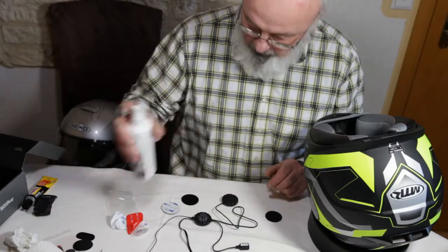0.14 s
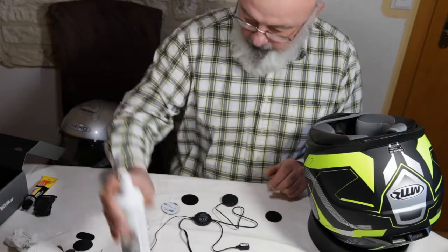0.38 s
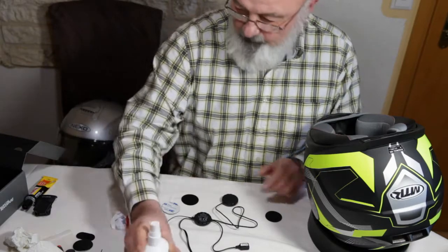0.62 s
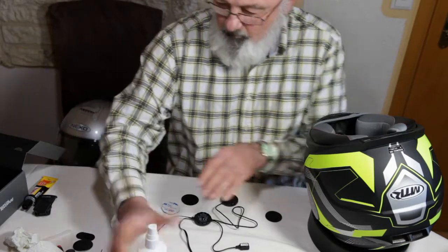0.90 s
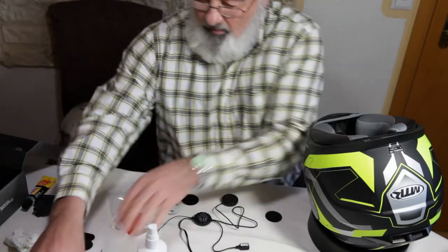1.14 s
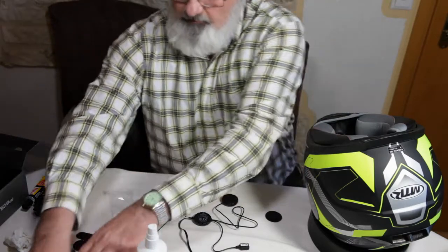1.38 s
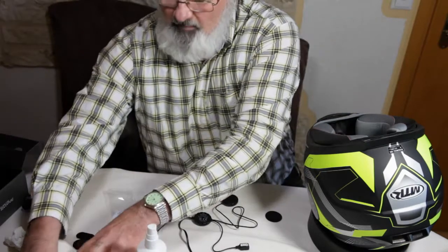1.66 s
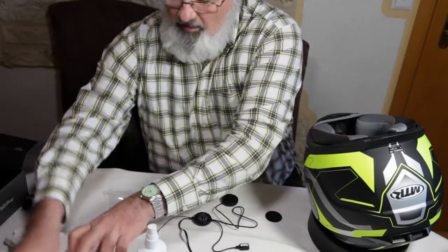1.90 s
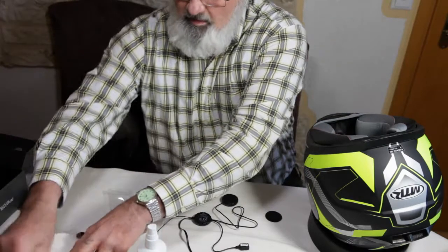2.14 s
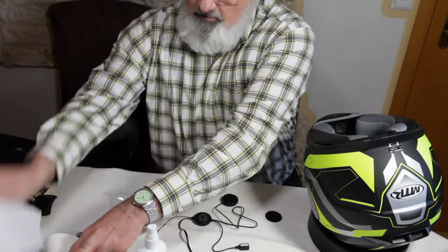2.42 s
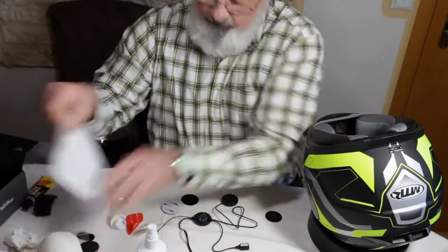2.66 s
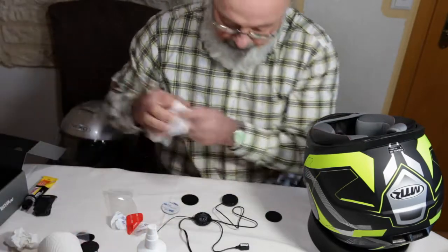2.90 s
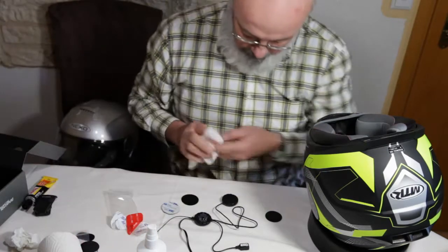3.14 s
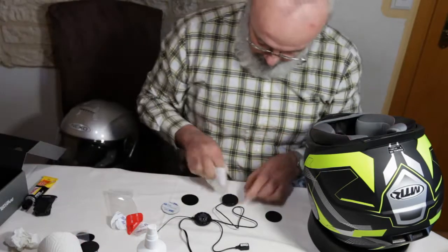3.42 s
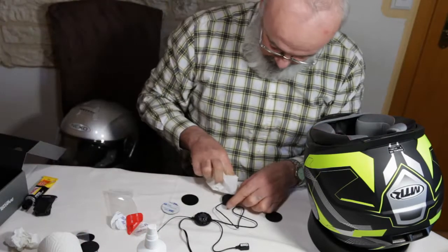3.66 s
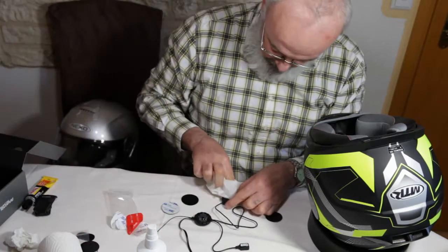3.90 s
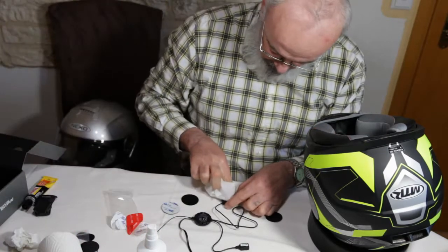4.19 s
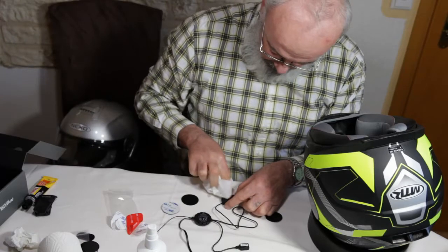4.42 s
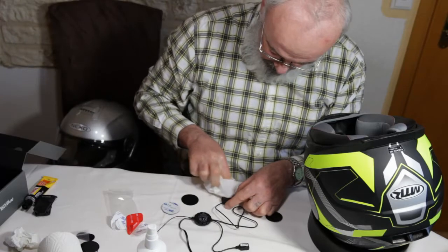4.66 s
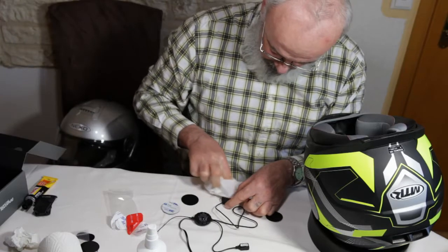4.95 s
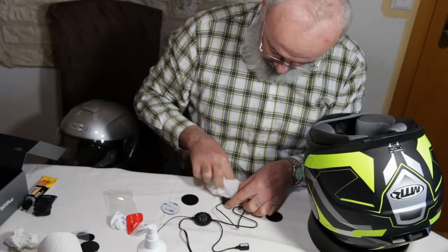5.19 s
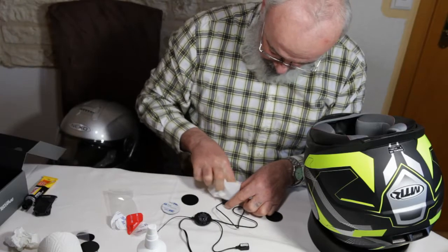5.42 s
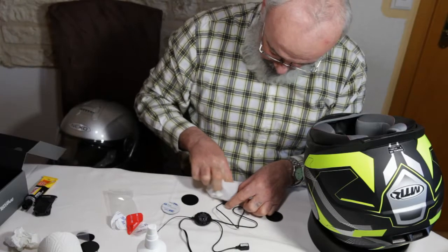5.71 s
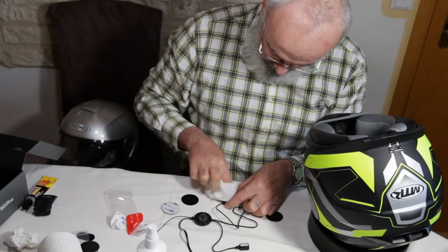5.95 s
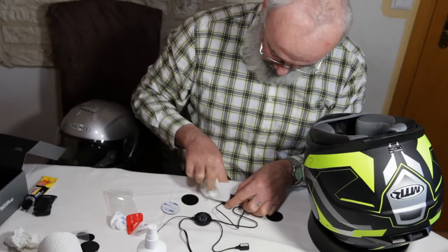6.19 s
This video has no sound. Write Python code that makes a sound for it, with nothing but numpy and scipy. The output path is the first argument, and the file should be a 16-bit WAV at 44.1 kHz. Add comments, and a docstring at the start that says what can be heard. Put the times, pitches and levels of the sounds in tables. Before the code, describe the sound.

In a quiet room, a dull table thump, papery rummaging, one loud crisp snap, tissue crumpling, then gentle back-and-forth rubbing.

```python
"""In a quiet room a bottle is set down on a cloth-covered table, hands rummage in a cardboard box,
pull out a paper tissue with a sharp clack, crumple it and wipe small plastic discs back and forth.
Rubbing is noise and tiny clicks shaped by strokes; knocks, snaps and bottle are decaying modes.
The near sounds excite a reverberant tail, over steady room tone. One microphone feeds both channels."""
import sys
import numpy as np
from scipy import signal
from scipy.io import wavfile
from scipy.ndimage import uniform_filter1d

SR = 44100
rng = np.random.default_rng(int(sys.argv[2]) if len(sys.argv) > 2 else 0)


def natural_amplitude(level_db):
    """Convert a level in decibels to a linear amplitude factor, elementwise."""
    exponent = np.asarray(level_db, float) / 20
    return 10 ** exponent


def wav_record(signal):
    """Record a signal, one row per channel, as 16-bit PCM in the file named by sys.argv[1]."""
    frames = np.transpose(np.atleast_2d(signal))
    bounded = np.clip(frames, -1, 1)
    # unit amplitude maps onto the largest positive 16-bit level
    quanta = np.round(bounded * 32767).astype(np.int16)
    wavfile.write(sys.argv[1], SR, quanta)


N = 279153  # length in samples


def evened(x):
    """Normalisation: scales a signal to rms 1."""
    return x / np.sqrt(np.mean(x ** 2) + 1e-20)


def at_log_frequency(points, hz):
    """Interpolation on a log-frequency axis, which follows pitch intervals."""
    point_hz, value = np.transpose(points)
    return np.interp(np.log(hz + 1), np.log(point_hz + 1), value)


def add(mix, start_s, sound):
    """Superposition: adds a sound to the mix at its start time."""
    part = mix[max(round(start_s * SR), 0):][:len(sound)]
    part += sound[:len(part)]


def coloured(x, spectrum, patchy_db):
    """Spectral filtering at rms 1, with a gain that wanders in patches of time and frequency."""
    hz, _, z = signal.stft(x, SR, nperseg=1024, noverlap=768)
    patches = rng.standard_normal(z.shape[::-1]).T
    patches = uniform_filter1d(patches, size=12, axis=0)
    patches = evened(uniform_filter1d(patches, size=10, axis=1))
    gain_db = at_log_frequency(spectrum, hz)[:, None] + patchy_db * patches
    filtered = signal.istft(z * natural_amplitude(gain_db), nperseg=1024, noverlap=768)[1]
    return evened(filtered[:N])


def slips(per_s, spread_db, clump_db):
    """Stick-slip: fibres catch and let go in uneven, clumped clicks over a smooth noise bed."""
    chance, size = rng.random(N), rng.exponential(1, N)
    bed, slow = rng.standard_normal(N), rng.standard_normal(N)
    clicks = natural_amplitude(spread_db * np.minimum(size, 5)) * (chance < per_s / SR) * np.sign(bed)
    clumps = evened(uniform_filter1d(uniform_filter1d(slow, size=500), size=300))
    return (evened(clicks) + 1.06 * bed) * natural_amplitude(clump_db * clumps)


def strokes(rows, over_db=0, lag_s=0):
    """Power envelope of friction strokes: each swells to a peak and dies away; powers add."""
    bend = 1.42  # 1 = pointed peak, 2 = round
    power = np.zeros(N)
    for (peak_s, db, rise_s, fall_s), extra_db in zip(rows, over_db + np.zeros(len(rows))):
        t = np.arange(-round(4 * rise_s * SR), round(4 * fall_s * SR)) / SR
        swell = np.exp(-2 * abs(t / np.where(t < 0, rise_s, fall_s)) ** bend)
        add(power, peak_s + lag_s + t[0], natural_amplitude(db + extra_db) ** 2 * swell)
    return power


def room_tone():
    """Stationary background noise: room tone and preamp hiss as one filtered noise."""
    # spectrum of the background: hz, relative_db
    tone_spectrum = [(25, 2), (50, -13), (80, -2.5), (110, -0.5), (180, -3.5), (280, -4.5), (400, -14.5),
                     (800, -14), (2000, -17), (4500, -12.5), (7500, -12), (10000, -17.5), (16000, -26.5)]
    return natural_amplitude(-55.5) * coloured(rng.standard_normal(N), tone_spectrum, 1.0)


def fibre_hiss(powers):
    """Friction noise: dense fibre slips hiss with the summed power of all contacts."""
    # spectrum of the fibre hiss: hz, relative_db
    hiss_spectrum = [(500, -49), (1500, -19), (3000, -4.5), (5000, -2), (7500, -1.5), (9500, -9.5),
                     (12000, -29), (16000, -45)]
    return np.sqrt(sum(powers)) * coloured(slips(5000, 2.2, 0.9), hiss_spectrum, 1.0)


def crease_crinkle(powers):
    """Impulsive noise of creases: sparser, more clumped slips crinkle in the high treble."""
    # spectrum of the crinkle: hz, relative_db
    crinkle_spectrum = [(3000, -33), (8000, 1.5), (10000, -0.5), (12500, -4.5), (14500, -16), (16000, -20)]
    # crinkle level over the hiss while rummaging, crumpling, wiping and in light contact: level_db
    over_hiss_db = (-12.5, -12.5, -13.5, -11.5)
    gain = np.sqrt(sum(natural_amplitude(db) ** 2 * power for db, power in zip(over_hiss_db, powers)))
    return gain * coloured(slips(2500, 2.6, 1.8), crinkle_spectrum, 1.0)


def card_and_paper_rasp(rasp_gain, powers):
    """Friction exciting a resonator: card and paper rasp, and the box adds a hollow ring."""
    # spectrum of the rasp: hz, relative_db
    rasp_spectrum = [(250, -54), (600, -3.5), (1000, -0.5), (2000, -0.5), (3000, -2.5), (4500, -8.5),
                     (8000, -92)]
    # drive of the hollow ring over the rasp while rummaging and crumpling: level_db
    ring_over_rasp_db = (-6, -11)
    box_hz, box_width_hz = 1760, 480
    grit = coloured(slips(1500, 0.63, 0.14), rasp_spectrum, 1.42)
    box_gain = np.sqrt(sum(natural_amplitude(db) ** 2 * power for db, power in zip(ring_over_rasp_db, powers)))
    box = signal.lfilter(*signal.iirpeak(box_hz, box_hz / box_width_hz, SR), box_gain * grit)
    return rasp_gain * grit + box


def table_murmur(rasp_gain):
    """Structure-borne friction: the table murmurs with the rasp and with scuffs of a hand or the box."""
    # spectrum of the murmur: hz, relative_db
    murmur_spectrum = [(60, -19), (150, -8.5), (250, -6), (450, -1), (700, -15), (1500, -65)]
    # scuffs on the table top: peak_s, level_db, rise_s, fall_s
    scuffs = [(.285, -63, 0.013, 0.043), (.66, -54, 0.11, 0.047), (1.51, -60, 0.046, 0.022),
              (1.9, -48.5, 0.016, 0.024), (2.158, -55, 0.2, .02), (2.225, -36, 0.016, 0.029),
              (2.314, -38.5, 0.02, 0.033), (2.808, -45.5, 0.036, 0.12), (2.992, -49.5, .02, .05),
              (3.126, -53, 0.035, 0.072), (4.15, -56.5, 0.028, .06), (4.48, -57.5, 0.027, .1),
              (5.33, -56, 0.028, .08), (5.05, -56, 0.034, 0.047)]
    # murmur level at a rasp of -50 dB, and dB gained per dB of rasp
    murmur_db, follow = -60.5, .45
    following_power = natural_amplitude(murmur_db) ** 2 * (rasp_gain / natural_amplitude(-50)) ** (2 * follow)
    gain = np.sqrt(following_power + strokes(scuffs))
    return gain * coloured(slips(600, 3.2, 0.96), murmur_spectrum, 2.35)


def rubbing():
    """Shared excitation: the same strokes drive hiss, crinkle, rasp and murmur; resonances colour the last two."""
    # hands rummage in the box and pull the tissue:
    # peak_s, hiss_level_db, rise_s, fall_s, rasp_over_hiss_db
    rummage = [(.72, -48.5, 0.11, 0.28, -15), (1.01, -46, 0.1, 0.084, -7.5), (1.13, -45, 0.1, 0.16, -2.5),
               (1.29, -49.5, 0.065, 0.045, -5), (1.494, -41.5, 0.019, 0.016, -4.5),
               (1.6, -45.5, 0.083, 0.045, 0), (1.66, -50, 0.038, 0.024, 0),
               (1.75, -41.5, 0.028, 0.055, -0.5), (1.82, -39, 0.059, 0.047, 0.5),
               (1.895, -38.5, 0.029, .025, -4.5), (1.955, -40.5, .02, 0.042, -9),
               (2.05, -41, .025, 0.024, -10), (2.125, -35, 0.045, 0.12, -4), (2.195, -31.5, 0.078, .02, -2),
               (2.214, -23, 0.011, 0.0039, 3), (2.235, -38.5, 0.014, 0.027, 11.5),
               (2.255, -34.5, 0.017, .025, -1.5), (2.32, -39, 0.017, 0.013, 4),
               (2.35, -53.5, .03, 0.059, 10.5)]
    # the tissue is lifted, shaken out and crumpled: same columns
    crumples = [(2.435, -49, 0.015, .025, -2), (2.49, -46, 0.034, 0.048, -2),
                (2.59, -47.5, 0.033, 0.12, -6.5), (2.73, -50, 0.026, .04, -20),
                (2.805, -34.5, .02, 0.1, -3.5), (3.0, -37.5, 0.072, 0.2, -7),
                (3.134, -36.5, 0.15, 0.071, -6), (3.276, -38, 0.02, 0.049, -8),
                (3.385, -43, 0.034, 0.076, -2), (3.59, -44.5, 0.075, 0.082, -4)]
    # the tissue wipes to and fro: same columns
    wipes = [(3.86, -47, 0.058, 0.093, -6.5), (3.95, -52.5, .04, 0.055, -3.5),
             (4.15, -44.5, 0.044, 0.043, -6.5), (4.275, -51, 0.064, 0.039, -4.5),
             (4.52, -47.5, 0.072, 0.041, -4.5), (4.605, -48, 0.056, 0.052, -3.5),
             (4.805, -46, 0.064, 0.053, -5), (4.905, -48.5, 0.11, 0.047, -5.5), (5.105, -49, 0.1, 0.12, -3),
             (5.315, -52, 0.07, 0.027, -10), (5.41, -48.5, 0.11, 0.12, -3.5),
             (5.665, -48, 0.074, 0.13, -2.5), (5.96, -48.5, 0.087, 0.061, -2.5),
             (6.035, -50, 0.051, .055, -4.5), (6.25, -47, 0.082, 0.11, -3.5)]
    # sleeves and hands keep light contact between strokes: time_s, hiss_level_db, rasp_level_db
    contact = [(0, -63, -65), (.35, -61.5, -65), (.39, -57, -64), (.53, -59.5, -65), (0.558, -45.5, -45),
               (.61, -71, -53), (.9, -56, -54.5), (1.4, -52, -52), (1.7, -48, -47), (2.0, -53, -45),
               (2.3, -54, -37), (2.45, -52.5, -58.5), (2.75, -50.5, -52.5), (3.5, -50, -54),
               (3.72, -71, -60.5), (4.05, -76.5, -62.5), (4.4, -58, -59), (5.0, -63.5, -61),
               (6.33, -63, -63)]
    # delay of the rasp peak after the hiss peak while rummaging, crumpling, wiping: delay_s
    rasp_lags = (.002, 0.0054, 0.011)
    # pitches that table top and walls favour: pitch_hz, width_hz, gain_db
    favoured = [(228, 4.4, 2.5), (257, 4.6, 3.5), (445, 18, -17), (545, 47, -1), (734, 34, -0.5),
                (872, 32, -7.5), (1251, 20, -9), (1360, 50, -7), (1580, 18, -10), (2102, 11, 2.5),
                (2380, 14, -3), (2800, 22, -10)]

    t = np.arange(N) / SR
    contact_s, contact_hiss_db, contact_rasp_db = np.transpose(contact)
    contact_hiss = natural_amplitude(np.interp(t, contact_s, contact_hiss_db)) ** 2
    contact_rasp = natural_amplitude(np.interp(t, contact_s, contact_rasp_db)) ** 2

    handled = [np.array(rummage), np.array(crumples), np.array(wipes)]
    hiss_powers = [strokes(rows[:, :4]) for rows in handled] + [contact_hiss]
    rasp_powers = [strokes(rows[:, :4], rows[:, 4], lag_s) for rows, lag_s in zip(handled, rasp_lags)]
    rasp_gain = np.sqrt(contact_rasp + sum(rasp_powers))

    body = card_and_paper_rasp(rasp_gain, rasp_powers) + table_murmur(rasp_gain)
    rings = sum(natural_amplitude(db) * signal.lfilter(*signal.iirpeak(hz, hz / width_hz, SR), body)
                for hz, width_hz, db in favoured)
    return fibre_hiss(hiss_powers) + crease_crinkle(hiss_powers) + body + rings


def snaps():
    """Impulsive release: each snap is a briefly ringing tone plus a brighter crack of noise."""
    # snaps of card, paper and plastic, and dull fingertip taps:
    # start_s, ring_level_db, ring_hz, t60_ms (at least 3 is used), crack_level_db
    snap_rows = [(0.361, -40, 3250, 2.6, -55), (.3915, -38.5, 3980, 3.7, -52), (.552, -51, 3000, 4, -48),
                 (.5560, -51, 2000, 5.9, -40), (1.086, -30, 2900, 4, -35), (1.101, -35, 1400, 8, -40),
                 (1.150, -38, 1630, 5.7, -39), (1.354, -50, 278, 53, -60), (1.652, -35, 3950, 12, -44),
                 (1.655, -38, 1280, 30, -48), (1.758, -41, 2030, 5, -35), (2.196, -36, 11000, 4, -30),
                 (2.202, -17, 8550, 6.9, -11), (2.2030, -4.5, 5140, 5.4, -5.5),
                 (2.2073, -11, 2100, 11, -16), (2.2100, -10.5, 1030, 4.5, -31),
                 (2.2211, -9, 1060, 2.7, -31), (2.2255, -22, 1340, 10, -41), (2.2301, -15, 1200, 7, -19),
                 (2.232, -30, 5500, 6, -11), (2.245, -41, 10400, 3.5, -40), (2.2505, -26, 2080, 6, -30),
                 (2.298, -39, 9300, 3, -30), (2.3030, -22, 2600, 4.4, -18), (2.3095, -23, 2000, 3, -15.5),
                 (2.319, -37, 11000, 4, -24), (2.3237, -24, 1050, 10, -31), (2.760, -32, 3800, 3.6, -43),
                 (2.811, -30, 1850, 20, -28), (3.270, -37, 7160, 5.3, -32), (4.136, -47.5, 277, 83, -60),
                 (5.555, -43.5, 231, 90, -60), (5.633, -36, 4470, 4, -50)]
    out, t = np.zeros(N), np.arange(4000) / SR
    bright = signal.butter(3, (3000, 9030), "bandpass", fs=SR, output="sos")
    cracks = signal.sosfilt(bright, rng.standard_normal((len(snap_rows), len(t))))
    rise = 1 - np.exp(-(t / .0005) ** 2)
    for (start_s, ring_db, hz, t60_ms, crack_db), crack in zip(snap_rows, cracks):
        shape = rise * natural_amplitude(-60 * t * 1000 / max(t60_ms, 3))
        ring = shape * np.sin(2 * np.pi * hz * t)
        crack = shape * crack
        add(out, start_s, natural_amplitude(ring_db) * ring / abs(ring).max() + natural_amplitude(crack_db) * crack / abs(crack).max())
    return out


def knocks():
    """Modal excitation: a soft push rings the table; a longer contact leaves out the high modes."""
    # knocks on the table: start_s, peak_level_db, contact_ms
    knock_rows = [(0.537, -14, 3.8), (1.891, -41.5, 11), (1.949, -51, 8.5), (2.02, -45.5, 11.4),
                  (2.205, -36.5, 3.6), (2.299, -54, 2.8), (2.782, -53, 1.1), (2.978, -52, 2.2),
                  (5.529, -50.5, 1.4)]
    # modes of the table top: pitch_hz, relative_db, t60_s
    table_modes = [(66.5, -10, .55), (113, -3, .19), (152, 0, .21), (180, 5, .045), (185, -8, .17),
                   (232, -16, .32), (272, -20, .3), (410, -22, .2), (510, -24, .2), (735, -12, .15),
                   (900, -14, .12)]
    node_hz = 168  # modes above this swing the other way at the point struck
    out, t = np.zeros(N), np.arange(SR // 2) / SR
    ring = sum(np.sign(node_hz - hz) * natural_amplitude(db - 60 * t / t60_s) * np.sin(2 * np.pi * hz * t)
               for hz, db, t60_s in table_modes)
    ring *= 1 - np.exp(-t / .003)  # the top takes up the blow
    for start_s, db, contact_ms in knock_rows:
        push = np.hanning(max(round(contact_ms * SR / 1000), 3))
        sound = signal.oaconvolve(ring, push)
        add(out, start_s, natural_amplitude(db) * sound / abs(sound).max())
    return out


def bottle():
    """Modal excitation: the plastic bottle rocks to rest on fixed modes; a longer contact is duller."""
    # rocks of the bottle: start_s, gain_db, contact_ms (three samples are added)
    rocks = [(.543, -49, 1.3), (.555, -41, 0.52), (.568, -37, 0.41), (.585, -37.5, 1.1)]
    # modes of the bottle: pitch_hz, relative_db, t60_s
    bottle_modes = [(430, 2, 0.07), (510, -2, 0.082), (730, 3, .07), (850, -2, 0.034), (1030, -1, 0.035),
                    (1400, -4, .05), (1740, -3, .05)]
    out, t = np.zeros(N), np.arange(6000) / SR
    ring = sum(natural_amplitude(db - 60 * t / t60_s) * np.sin(2 * np.pi * hz * t) for hz, db, t60_s in bottle_modes)
    for start_s, db, contact_ms in rocks:
        push = np.hanning(round(contact_ms * SR / 1000) + 3)
        add(out, start_s, natural_amplitude(db) * signal.oaconvolve(ring, push / push.sum()))
    return out


def room(x):
    """Reverberation: sparse reflections of random sign, each band decaying at its own speed."""
    # decay of the room: hz, t60_s
    decay_times = [(100, 0.57), (500, 0.48), (2000, 0.32), (8000, 0.21)]
    taps = np.zeros(SR // 2)
    at = np.arange(200, len(taps) - 20, 20)
    taps[at + rng.integers(0, 20, len(at))] = rng.choice([-1., 1.], len(at))
    hz, t, z = signal.stft(taps, SR, nperseg=256)
    decay = natural_amplitude(-60 * t / at_log_frequency(decay_times, hz)[:, None])
    tail = signal.istft(z * decay, SR, nperseg=256)[1]
    return signal.oaconvolve(x, tail / np.linalg.norm(tail))[:N]


def scene():
    """Superposition of near sounds, their room tail, table knocks and room tone."""
    near = rubbing() + snaps() + bottle()
    mono = near + natural_amplitude(-11.5) * room(near) + knocks() + room_tone()
    return np.array([mono, mono])


def roll_off(x):
    """The treble ends steeply here."""
    return signal.sosfilt(signal.butter(12, 15750, fs=SR, output="sos"), x)


def record(dry):
    """High-pass filtering and clipping: the microphone drops the deepest bass, the input limits peaks."""
    low_cut_hz, ceiling = 55, .95
    cut = signal.sosfilt(signal.butter(2, low_cut_hz, "highpass", fs=SR, output="sos"), dry)
    mix = np.clip(cut, -ceiling, ceiling)
    return roll_off(mix)


dry = scene()
out = record(dry)
wav_record(out)
```